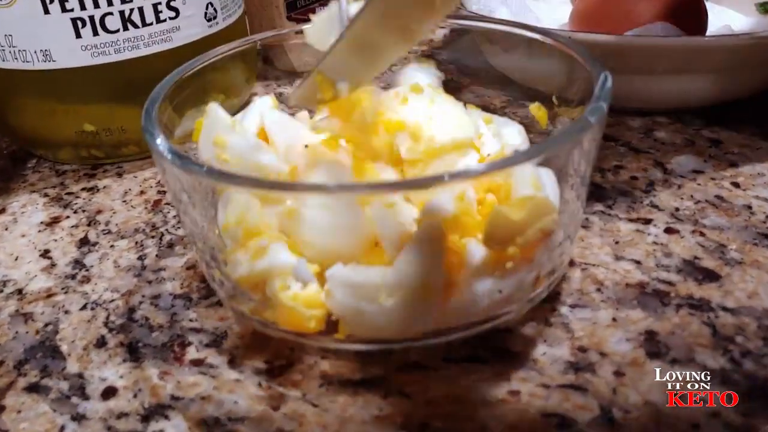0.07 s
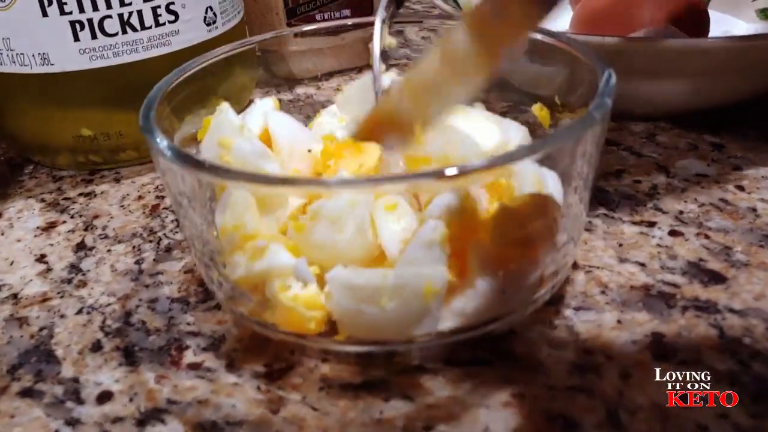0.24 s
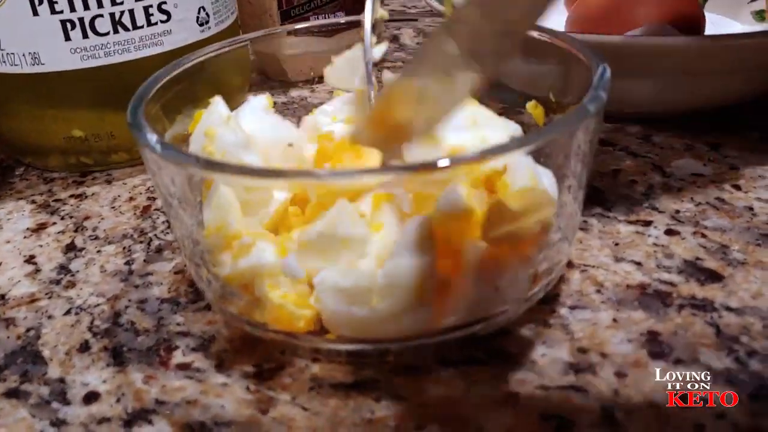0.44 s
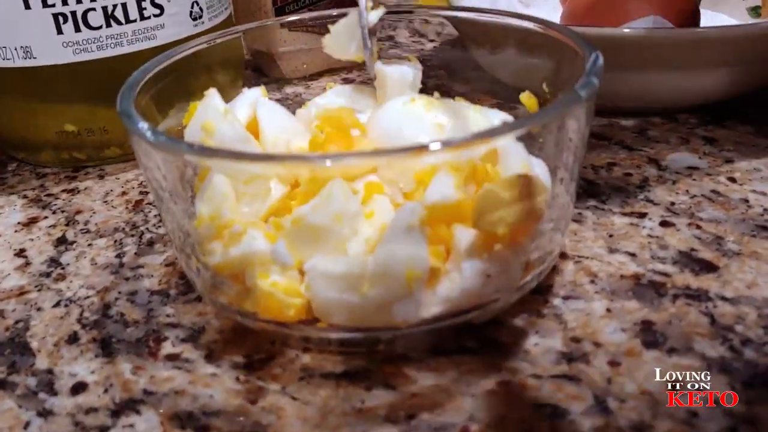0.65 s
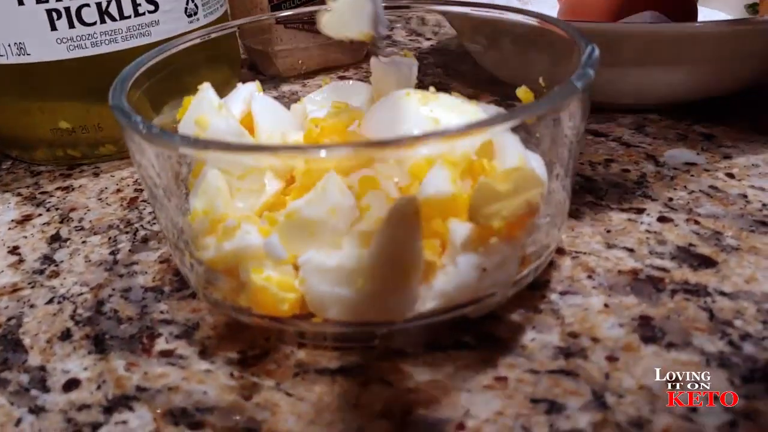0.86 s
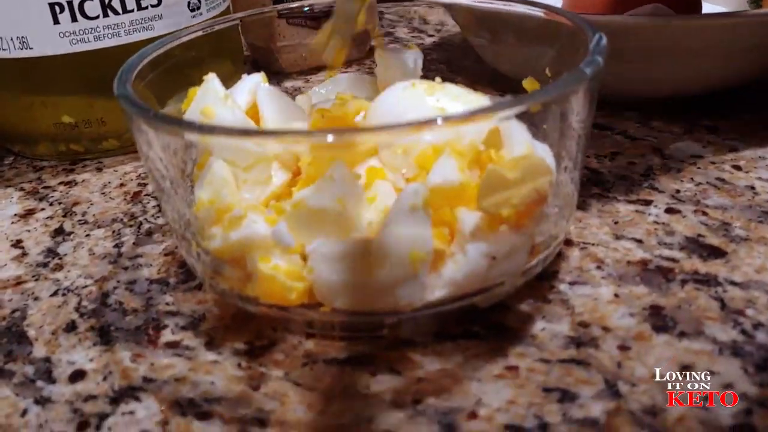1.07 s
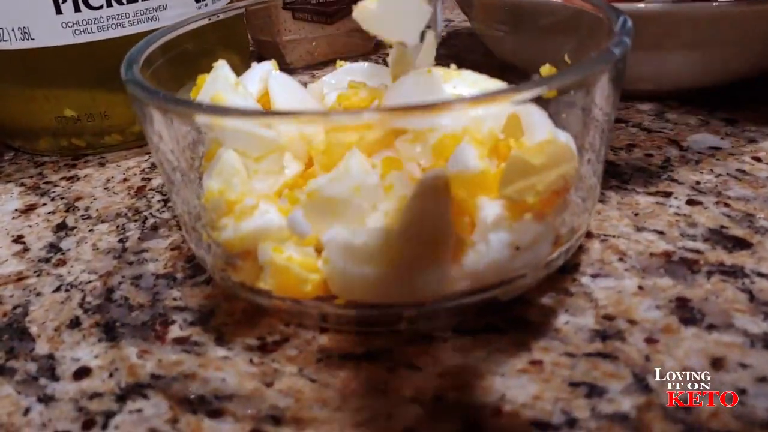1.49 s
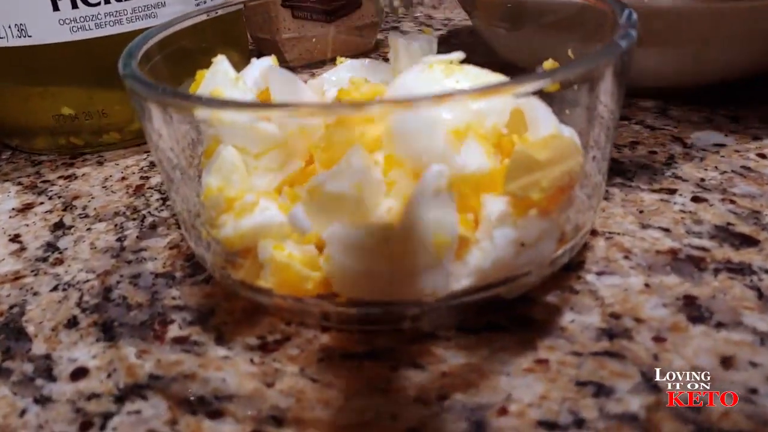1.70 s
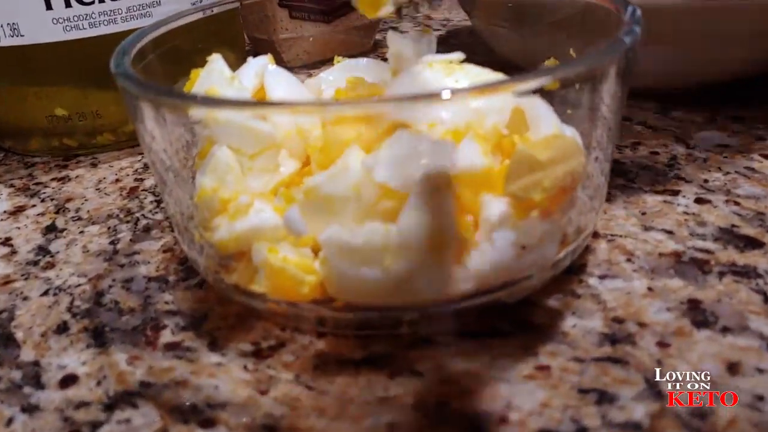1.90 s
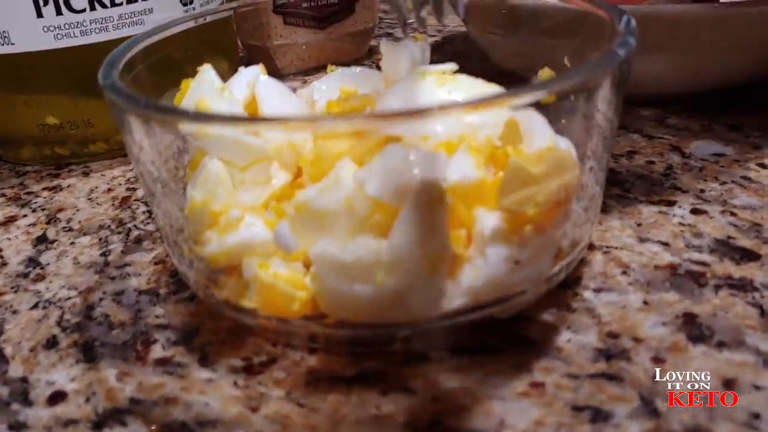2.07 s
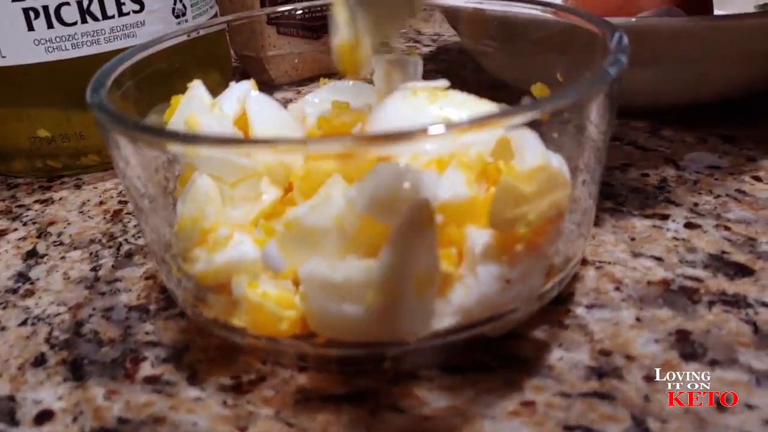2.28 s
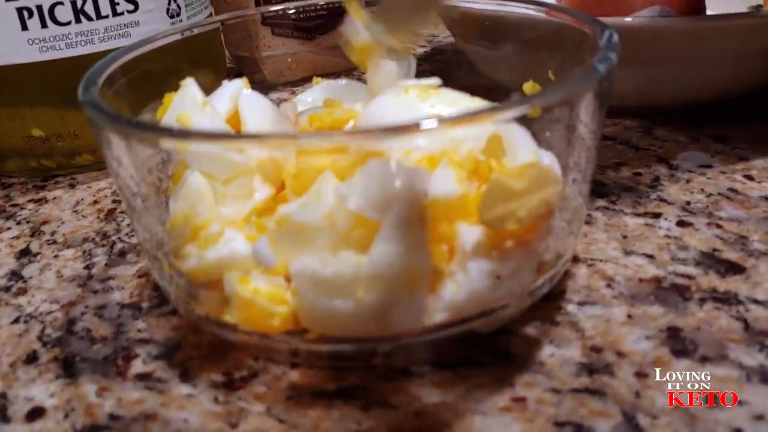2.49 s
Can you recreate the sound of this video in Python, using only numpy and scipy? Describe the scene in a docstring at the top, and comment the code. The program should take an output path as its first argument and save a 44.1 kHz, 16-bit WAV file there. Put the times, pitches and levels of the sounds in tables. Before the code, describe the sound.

Metal cutlery clinks against a dish, close by in a small kitchen. At 0.2 seconds a utensil knocks a glass bowl's rim, then clacks onto a stone counter at 0.4. Soft ticks and squeaky scrapes come around 1 second. Five brighter clinks follow between 1.5 and 2.5 seconds, most bouncing into short gritty slides, the loudest near 2.3. Faint room noise and appliance hum continue throughout.

```python
"""A small kitchen, ringing faintly, with dull air noise and the hum of an appliance.
A metal utensil knocks once on the rim of a glass bowl and is put down with a clack on a stone counter.
Then cutlery clinks seven times on a dish; most clinks bounce, and most run on into a short gritty slide.
Each impact gives a crack of noise and excites the damped normal modes of the bodies in contact;
sliding friction drives the cutlery's modes with many tiny impulses, and stick-slip makes it squeak."""
import sys
import numpy as np
from scipy import signal
from scipy.fft import rfft, irfft
from scipy.io import wavfile
from scipy.ndimage import uniform_filter1d

SR = 44100
rng = np.random.default_rng(int(sys.argv[2]) if len(sys.argv) > 2 else 0)


def to_wav(sig):
    """Store sig (one row per channel, or 1-D mono) as 16-bit WAV at the path in sys.argv[1].

    Samples outside -1..1 are clipped; the rate is SR.
    """
    pcm = np.clip(np.atleast_2d(sig), -1, 1) * 32767
    pcm = np.round(pcm).astype(np.int16)
    wavfile.write(sys.argv[1], SR, pcm.T)  # frames by channels


N = 116865
TIME = np.arange(N) / SR

# Air noise. Each row: frequency in Hz, relative spectral level in dB.
AIR_SPECTRUM = [(20, -19.5), (36, -15), (47, 2.5), (60, -5), (80, -4.5), (120, -7), (155, -15), (200, -8),
                (300, -10.5), (420, -14.5), (560, -18), (760, -22.5), (1120, -32.5), (1950, -31),
                (2500, -43), (8340, -50), (11400, -53.5), (13000, -66)]
# Likeness of the air noise at the two ears. Each row: frequency in Hz, correlation from 0 to 1.
AIR_CORRELATION = [(40, .7), (80, 0.38), (200, 0.92), (500, 0.69), (1500, 0.18), (8000, 0.082)]
# Appliance hum. Each row: frequency in Hz, rms level in dB, pan (left minus right) in dB.
HUM_PARTIALS = [(47.95, -57, 6.5), (90.7, -65, 9.5), (184.1, -56.5, 1), (238.5, -61, 0), (290.6, -60.5, -3),
                (368.6, -63, 0.5), (451.3, -66.5, 1.5)]
# Kitchen reverberation. Each row: frequency in Hz, T60 (time to fall by 60 dB) in seconds.
REVERB_T60 = [(300, .35), (2000, 0.38), (4800, 0.28), (6500, 0.19), (11000, 0.21)]
# Echoes off the counter and jars. Each row: left delay in seconds, right delay in seconds, gain in dB.
EARLY_ECHOES = [(.0021, .0024, -21), (.0043, .0039, -27.5), (.0072, .0078, -21), (.0118, .0109, -15)]

# Normal modes of the bowl, the utensil on the counter, the cutlery on the dish and its loud tines.
# Each row: frequency in Hz, relative level in dB, T60 in seconds, pan in dB, left phase lead in radians.
BOWL_MODES = [(1054, -23.5, .1, 1, .7), (1234, -16, .075, 3, .8), (3108, -15.5, .08, -5, -2.6),
              (5414, -12, .085, 0, 1.1), (1414, -10, .06, 1, .8), (1530, -24, .11, 3, .8),
              (1836, -30, .12, 8, 0), (2035, -26, .12, 8, -.4), (2280, -31, .1, 7, 0),
              (3160, -20, .06, 0, -2), (5296, -23, .06, 0, 1), (5503, -23, .06, 2, .8),
              (8298, -23, .085, -4, 2.7), (11700, -39, .08, 0, 2.7)]
COUNTER_MODES = [(1302, -35.5, 0.06, -16, 0), (1620, -19.5, 0.043, -1, 4.5),
                 (1842, -21.5, 0.051, 13.5, -4.5), (2440, -23, 0.027, 3, 1.5), (4520, -36.5, 0.085, -1, 5),
                 (4930, -26.5, 0.038, 9, 4.7), (4760, -33, 0.074, 3, 8.5), (6570, -30, 0.0095, 3, -2),
                 (8370, -37.5, 0.031, -19, 10)]
CUTLERY_MODES = [(1076, -45, 0.035, 18.5, 1), (2037, -31.5, 0.026, 24, -1.7),
                 (3080, -38, 0.048, -10.5, -0.1), (3830, -30.5, 0.023, -27, 1),
                 (3910, -27, 0.054, -4.5, -0.86), (4893, -19, 0.028, 6.5, -1.7),
                 (6100, -26.5, .035, -0.5, 0), (6527, -26.5, 0.041, 18.5, 0),
                 (7000, -21, 0.0446, -0.5, 0.5), (8140, -34.5, 0.045, -0.5, 0),
                 (8530, -26.5, 0.031, -12.5, 1), (10320, -27, 0.039, 1.5, 1),
                 (11600, -30, 0.025, 4.5, 0.066)]
TINE_MODES = [(6505, -17, 0.012, 16.5, 0.0089), (6587, -9.5, 0.051, 14.5, 0.0058)]
# Contact noise of the impacts and slides. Each row: frequency in Hz, relative spectral level in dB.
BOWL_CRACK_SPECTRUM = [(200, -22), (600, -13), (1300, 5.5), (2600, -8), (5500, -10), (7200, -17),
                       (8700, -19.5), (10000, -57.5), (13000, -56.5)]
COUNTER_CRACK_SPECTRUM = [(90, 1.5), (220, 7), (600, -3), (1000, -7.5), (1700, 2.5), (2400, 4.5),
                          (3600, -9.5), (4800, 7), (5800, -5.5), (9500, -8), (11600, -20.5), (12600, -24)]
CUTLERY_CRACK_SPECTRUM = [(300, -26), (1000, -8), (1500, -17), (2050, -1.5), (2600, -9.5), (3300, -1),
                          (4900, -1), (6500, -2.5), (7500, -5.5), (8400, 11), (9400, -12.5), (10500, 12),
                          (11600, 3.5), (12400, -13.5)]
GRIT_SPECTRUM = [(400, -39.5), (1500, -13.5), (2100, -3.5), (2600, -10), (3200, -2.5), (4900, 1.5),
                 (7300, -7.5), (8200, 7.5), (9400, -1.5), (11600, 2), (12300, -35.5)]
# Impacts and any rebounds. Each row: start in seconds, gain in dB, slope in dB per octave, pan in dB,
# gain of the main modes (for the cutlery, the tines) in dB, accent frequency in Hz, accent gain in dB.
BOWL_IMPACTS = [(0.2055, 1, 1.5, 0, 0, 1330, 1), (0.2128, -19, -3, -8, -0.5, 5830, 11),
                (0.2190, -18.5, -1, -2.5, 5, 3100, 11.5)]
COUNTER_IMPACTS = [(0.3733, 1, 1.5, 0.5, 1, 2157, 1.5)]
CUTLERY_IMPACTS = [(0.9665, -20, -1.5, 0, -2.5, 4850, 10), (1.1170, -19.5, -1.5, 1.5, -24, 5700, -11),
                   (1.5490, -7, -0.5, 1, -3.5, 3130, 7), (1.5537, -18.5, -6, -5, -23, 10500, -12.5),
                   (1.8680, -4, -0.5, -2, -12, 3000, 5.5), (1.8748, -19.5, -1.5, 1.5, 6.5, 6000, 8.5),
                   (1.9077, -30, 1.5, 2.5, 11.5, 4900, 20.5), (1.9332, -24.5, -2, 4.5, 1.5, 5000, 13.5),
                   (2.0838, -9, -4, 5, 2, 4900, 6.5), (2.0895, -9, 8, -2.5, -13.5, 2050, 11),
                   (2.1297, -31.5, -3, 0.5, 14.5, 3900, -1), (2.1515, -27.5, 3, -3.5, 8, 6500, 3.5),
                   (2.2894, -2, -1, 0, -2.5, 8500, 4), (2.2965, -24, -6, 1.5, -11, 3900, 2.5),
                   (2.3378, -22, -1.5, 4, 5.5, 8400, 14), (2.3500, -29.5, 3, -2, 11.5, 6500, 5),
                   (2.4882, -13.5, -0.5, 0.5, -36, 4300, 9.5), (2.5030, -20.5, 0.5, 0.5, -10, 8700, -7)]
# Squeaks. Each row: start in seconds, length in seconds, first and last pitch in Hz, rms level in dB.
SQUEAK_GLIDES = [(0.995, 0.023, 7840, 8200, -52), (1.033, 0.02, 3890, 3870, -59),
                 (1.048, 0.028, 5240, 5570, -55.5), (1.048, .04, 7670, 8450, -52),
                 (1.055, 0.022, 9400, 9900, -55), (1.113, 0.037, 5690, 5740, -45.5),
                 (1.594, 0.023, 4300, 4300, -46), (1.899, 0.017, 4790, 4780, -45),
                 (1.928, 0.024, 4930, 5160, -45.5), (2.338, 0.014, 5000, 4930, -46)]
# Slides on the dish. Each row: start in seconds, length in seconds, level in dB, swell in dB,
# slope in dB per octave, ringing relative to the grit in dB.
SLIDE_STROKES = [(0.607, 0.15, -72.5, 0, -6, -10), (0.981, 0.067, -51, -1, -1.5, -4.5),
                 (1.05, 0.049, -49, -10.5, 5.5, -2.5), (1.111, 0.027, -37.5, -3, 0, -8),
                 (1.564, 0.04, -47, -15, -4, -3.5), (1.597, 0.032, -46.5, 7.5, -1.5, 7),
                 (1.876, 0.028, -44, -4, -2.5, 8), (1.907, 0.042, -47.5, -1.5, 3.5, 10.5),
                 (2.099, 0.025, -50.5, 11.5, -1, 10.5), (2.126, 0.02, -46.5, 2.5, 2, 11.5),
                 (2.3, 0.037, -44, -2.5, -2, 6.5), (2.342, 0.022, -44.5, -5.5, 3, 7.5)]


def from_db(db):
    """Amplitude ratio of a level in decibels."""
    return 10 ** (np.asarray(db) / 20)


def unit_rms(x):
    """Normalisation to unit mean power."""
    return x / np.sqrt(np.mean(x ** 2) + 1e-20)


def panned(db):
    """Interaural level difference as left and right gains."""
    return from_db(np.array([[.5], [-.5]]) * db)


def at_hz(points, hz):
    """Interpolation on a logarithmic frequency axis."""
    known_hz, values = np.transpose(points)
    return np.interp(np.log(hz + 1), np.log(known_hz), values)


def add(out, start_s, sound):
    """Superposition of a sound from a given time on."""
    i = int(start_s * SR)
    out[:, i:i + sound.shape[1]] += sound[:, :N - i]


def stereo_noise(size, correlation):
    """Partial coherence: white noise with a part common to both ears and a part in antiphase."""
    mid, side = rng.standard_normal((2, size))
    return (np.sqrt(1 + correlation) * mid + np.sqrt(1 - correlation) * side * [[1], [-1]]) / np.sqrt(2)


def tilt(hz, slope_db, accent_hz=6000, accent_db=0):
    """Spectral weighting by a contact: a slope per octave about 6 kHz and a narrow peak or dip."""
    octaves = np.log2(np.maximum(hz, 500) / 6000)
    centre, width_octaves = np.log2(accent_hz / 6000), 0.14
    accent = np.exp(-.5 * ((octaves - centre) / width_octaves) ** 2)
    return from_db(slope_db * octaves + accent_db * accent)


def colour(x, spectrum, touch, size=4096):
    """Minimum-phase filtering at unit power gain, so that no sound precedes its cause."""
    hz = np.fft.rfftfreq(size, 1 / SR)
    gain = unit_rms(from_db(at_hz(spectrum, hz)) * tilt(hz, *touch))
    cepstrum = irfft(np.log(gain + 1e-9))
    cepstrum[1:size // 2] *= 2  # fold onto positive time
    cepstrum[size // 2 + 1:] = 0
    response = irfft(np.exp(rfft(cepstrum)))
    return signal.fftconvolve(x, response[None], axes=1)[:, :x.shape[1]]


def air_noise(level_db=-48.5):
    """Stationary noise, strongest and most alike at the two ears at low frequencies."""
    hz = np.fft.rfftfreq(N, 1 / SR)
    correlation = at_hz(AIR_CORRELATION, hz)
    mid, side = rfft(rng.standard_normal((2, N))) * from_db(at_hz(AIR_SPECTRUM, hz))
    ears = np.sqrt(1 + correlation) * mid + np.sqrt(1 - correlation) * side * [[1], [-1]]
    return from_db(level_db) * panned(0.4) * unit_rms(irfft(ears, N))


def appliance_hum(waver_rad=0.8):
    """A line spectrum whose partials waver by slow random phase modulation."""
    out, knots_s = 0, np.linspace(0, TIME[-1], 24)
    for hz, db, pan_db in HUM_PARTIALS:
        waver = waver_rad * np.interp(TIME, knots_s, rng.standard_normal(len(knots_s)))
        out = out + np.sqrt(2) * from_db(db) * panned(pan_db) * np.sin(2 * np.pi * hz * TIME + waver)
    return out


def reverberation(x, tail_db, scatter_db=-17, scatter_t60=.07, lift_db_per_khz=0.2):
    """A diffuse field decays exponentially: quick nearby scatter, then a tail that dies band by band."""
    t, tail = TIME[:SR // 2], 0
    edges_hz = np.geomspace(150, 16000, 11)
    white = rng.standard_normal((2, 2, len(t)))
    for k, (low, high) in enumerate(zip(edges_hz, edges_hz[1:])):
        band = signal.sosfilt(signal.butter(2, [low, high], "band", fs=SR, output="sos"), white[k % 2])
        hz = np.sqrt(low * high)
        tail = tail + band * from_db(lift_db_per_khz * hz / 1000 - 60 * t / at_hz(REVERB_T60, hz))
    scatter = stereo_noise(len(t), 0.067) * from_db(-60 * t / scatter_t60) * (t > .0015)
    response = from_db(tail_db) * unit_rms(tail * (t > .008)) + from_db(scatter_db) * unit_rms(scatter)
    return signal.fftconvolve(x, response / np.sqrt(len(t)), axes=1)[:, :N]


def reflections(x):
    """Specular reflection: each nearby surface returns a delayed, weaker copy."""
    out = np.zeros((2, N))
    for left_s, right_s, db in EARLY_ECHOES:
        for ear, delay_s in enumerate((left_s, right_s)):
            out[ear] += from_db(db) * np.interp(TIME - delay_s, TIME, x[ear], left=0)
    return out


def ringing(modes, touch, vary_db):
    """Free vibration is a sum of damped normal modes; each contact weights them a little differently."""
    t, out = TIME[:SR // 3], 0
    for hz, db, t60, pan_db, lead_rad in modes:
        envelope = from_db(db + vary_db * rng.standard_normal() - 60 * t / t60) * tilt(hz, *touch)
        phase = 2 * np.pi * hz * t + lead_rad * np.array([[.5], [-.5]])
        out = out + envelope * panned(pan_db) * np.sin(phase)
    return out


def impacts(rows, main_modes, crack_spectrum, crack_db, crack_t60, attack_s, vary_db, other_modes=()):
    """Impulsive excitation: a contact cracks, and where it lands decides which modes ring most."""
    out, t = np.zeros((2, N)), TIME[:SR // 3]
    onset = 1 - np.exp(-(t / attack_s) ** 2)
    for start_s, db, slope_db, pan_db, main_db, accent_hz, accent_db in rows:
        touch = (slope_db, accent_hz, accent_db)
        burst = stereo_noise(len(t), .6) * from_db(crack_db - 60 * t / crack_t60)
        crack = colour(burst, crack_spectrum, touch)
        ring = ringing(other_modes, touch, vary_db)
        ring = ring + from_db(main_db) * ringing(main_modes, touch, vary_db)
        add(out, start_s, from_db(db) * panned(pan_db) * (crack + ring * onset))
    return out


def bowl_knock():
    """Impact and rebound: metal chatters on the rim and excites the inharmonic modes of the glass."""
    return impacts(BOWL_IMPACTS, BOWL_MODES, BOWL_CRACK_SPECTRUM,
                   crack_db=-17, crack_t60=0.08, attack_s=.0004, vary_db=1)


def counter_clack():
    """Strong damping: the modes of the utensil set down on stone die quickly, heard as a clack."""
    return impacts(COUNTER_IMPACTS, COUNTER_MODES, COUNTER_CRACK_SPECTRUM,
                   crack_db=-16, crack_t60=0.019, attack_s=0.00075, vary_db=0.5)


def squeaks(jitter_hz=110):
    """Stick-slip oscillation of the sliding edge gives brief tones of unsteady pitch."""
    out = np.zeros((2, N))
    for start_s, length_s, first_hz, last_hz, db in SQUEAK_GLIDES:
        progress = np.minimum(TIME[:SR // 10] / length_s, 1)
        jitter = unit_rms(uniform_filter1d(rng.standard_normal(len(progress)), size=60))
        hz = first_hz + (last_hz - first_hz) * progress + jitter_hz * jitter
        envelope = 2 * from_db(db) * np.sin(np.pi * progress)
        add(out, start_s, (envelope * np.sin(2 * np.pi * np.cumsum(hz) / SR))[None])
    return out


def slides(jerks_per_s=280, catches_per_s=3800, spread_db=2.2, attack_s=0.011, release_s=0.008):
    """Friction as forced vibration: the edge jerks through tiny catches that rasp and drive the modes."""
    out, t = np.zeros((2, N)), TIME[:SR // 4]
    jerk_times = np.arange(0, t[-1], 1 / jerks_per_s)
    pressed_gain = from_db(-5)  # the tines ring less while pressed on the dish
    for start_s, length_s, db, swell_db, slope_db, ring_db in SLIDE_STROKES:
        caught = rng.random(len(t)) < catches_per_s / SR
        chatter_db = np.interp(t, jerk_times, rng.uniform(-3.45, 3, len(jerk_times)))
        catches = caught * from_db(chatter_db + spread_db * np.minimum(rng.exponential(1, len(t)), 4))
        envelope = np.minimum(t / attack_s, 1) * np.exp(-np.maximum(t - length_s, 0) / release_s)
        level = from_db(db + swell_db * (np.minimum(t / length_s, 1) - .5))
        force = unit_rms(catches * stereo_noise(len(t), 0.073)) * envelope * level
        body = ringing(CUTLERY_MODES, [slope_db], vary_db=5)
        tines = pressed_gain * ringing(TINE_MODES, [slope_db], vary_db=0.5)
        ring = signal.fftconvolve(force[:1], body + tines, axes=1)[:, :len(t)]
        grit = colour(force, GRIT_SPECTRUM, [slope_db])
        add(out, start_s, grit + from_db(ring_db) * force.std() * unit_rms(ring))
    return out


def cutlery_clinks():
    """Repeated impact: each contact with the dish excites the modes of the cutlery and its tines."""
    return impacts(CUTLERY_IMPACTS, TINE_MODES, CUTLERY_CRACK_SPECTRUM, other_modes=CUTLERY_MODES,
                   crack_db=-13.5, crack_t60=0.026, attack_s=0.001, vary_db=1.5)


def scene():
    """Direct sound, echoes, reverberation and background superpose; knock and clack stir the room most."""
    blows = bowl_knock() + counter_clack()
    cutlery = cutlery_clinks() + slides() + squeaks()
    direct = blows + cutlery
    room = reverberation(blows, tail_db=-19) + reverberation(cutlery, tail_db=-22)
    return direct + reflections(direct) + room + air_noise() + appliance_hum()


def record(dry, ceiling=.9, cutoff_hz=12050):
    """Soft saturation rounds the highest peaks, and a steep low-pass filter limits the bandwidth."""
    rounded = dry / (1 + (dry / ceiling) ** 8) ** (1 / 8)
    return signal.sosfilt(signal.ellip(10, .3, 70, cutoff_hz, fs=SR, output="sos"), rounded)


dry = scene()
out = record(dry)
to_wav(out)
```